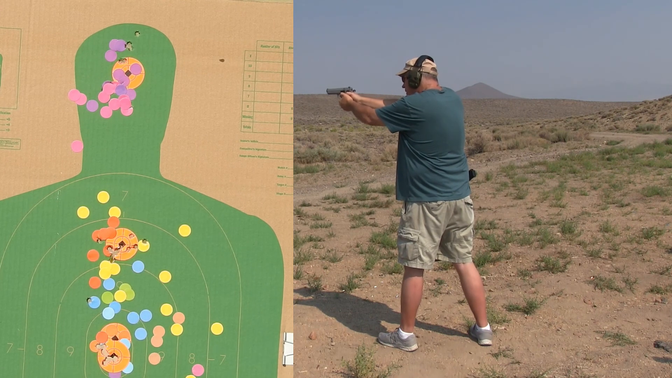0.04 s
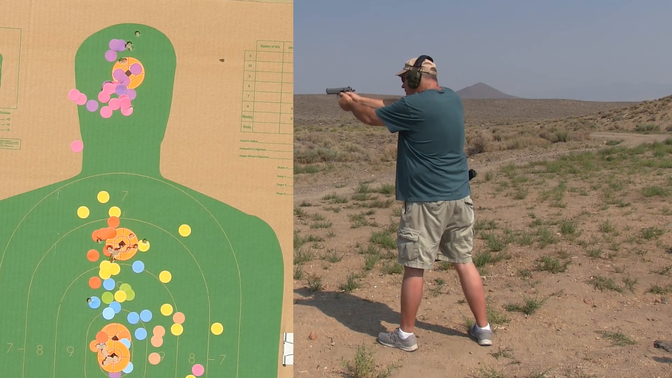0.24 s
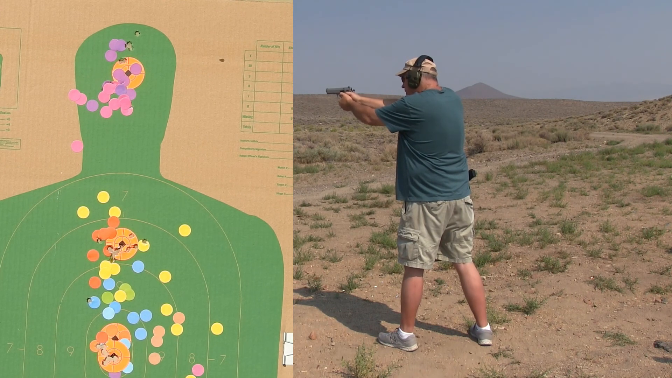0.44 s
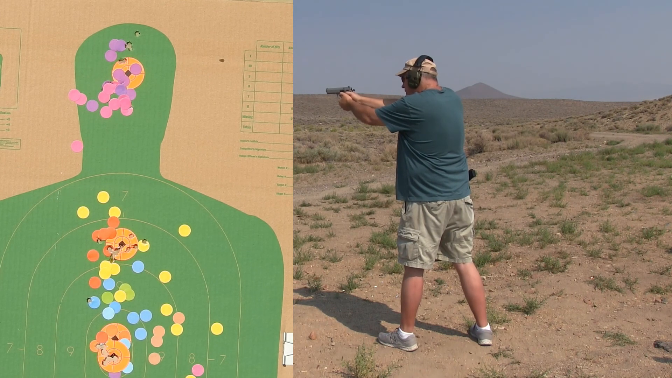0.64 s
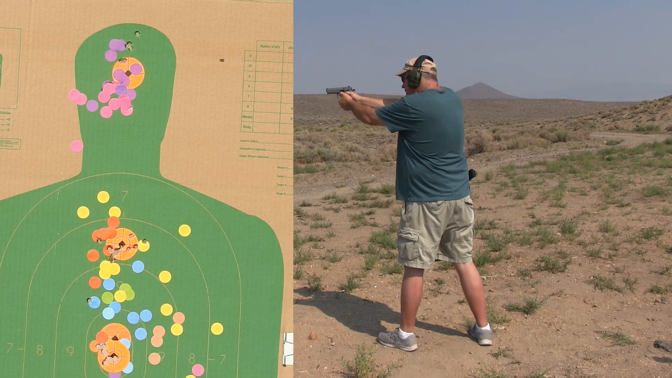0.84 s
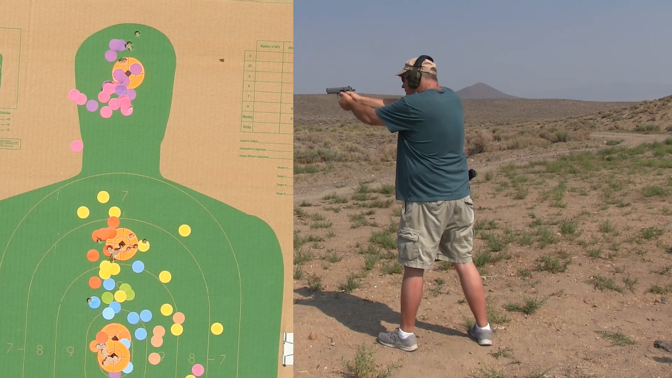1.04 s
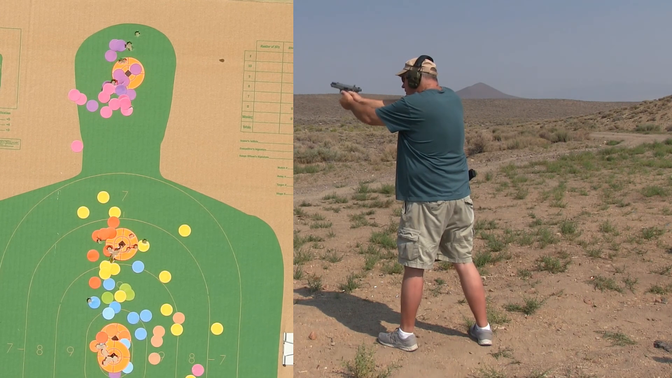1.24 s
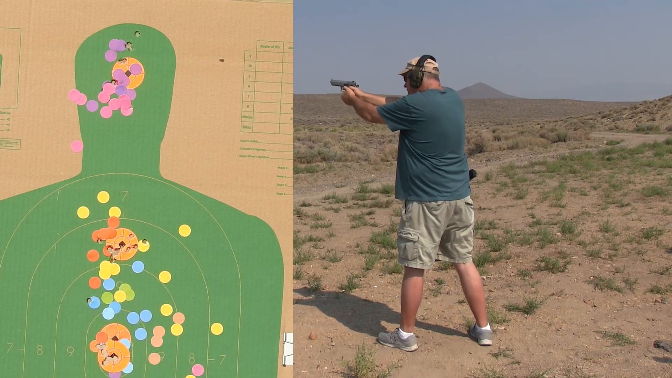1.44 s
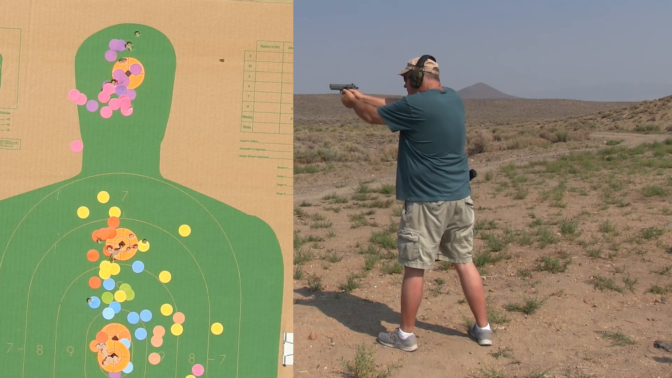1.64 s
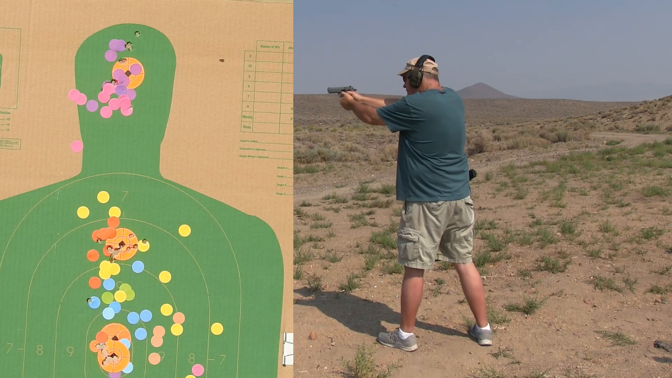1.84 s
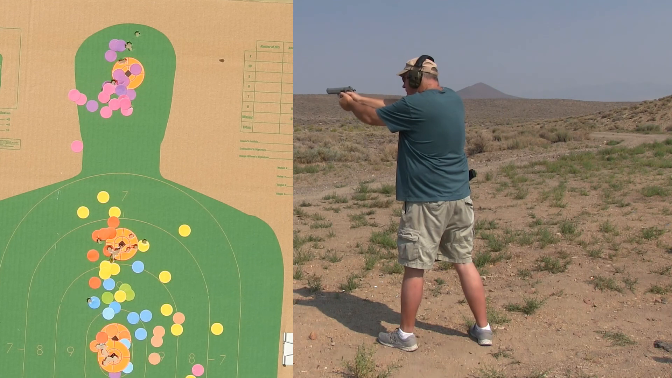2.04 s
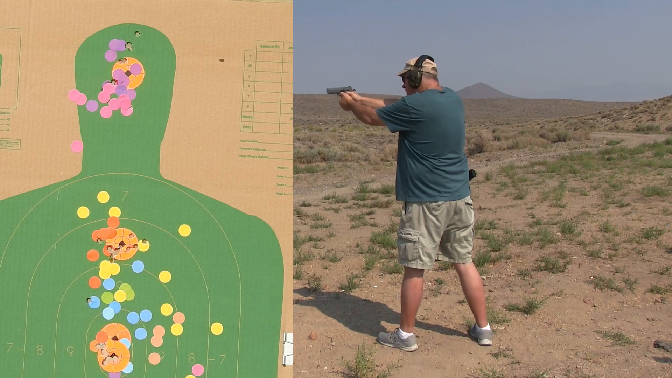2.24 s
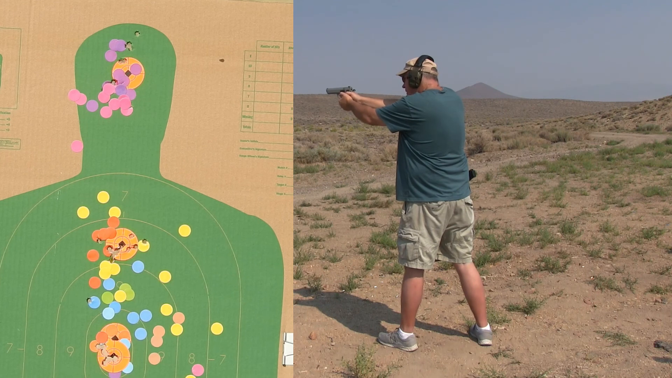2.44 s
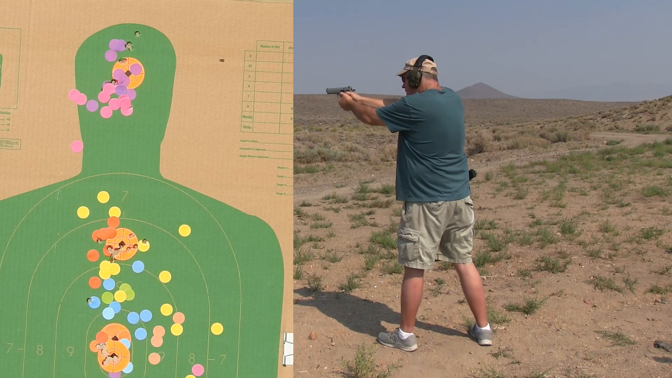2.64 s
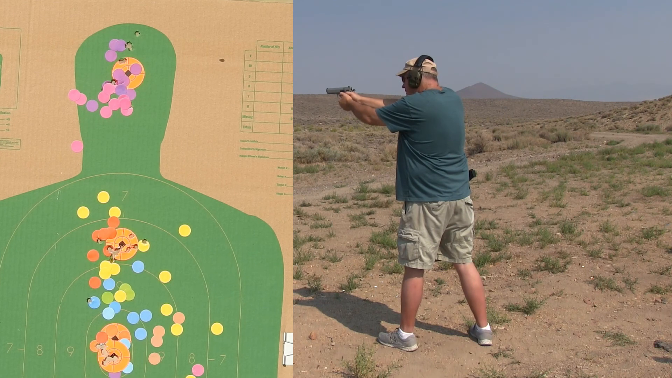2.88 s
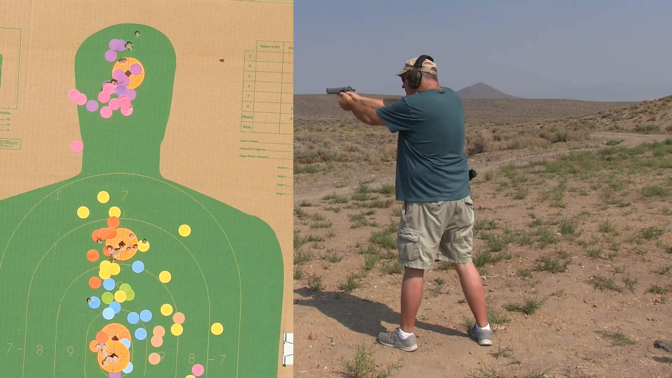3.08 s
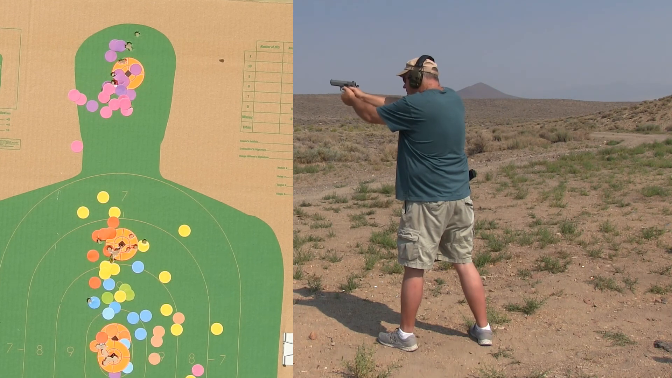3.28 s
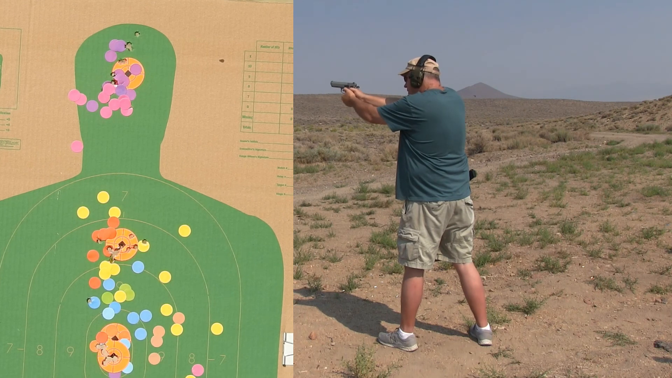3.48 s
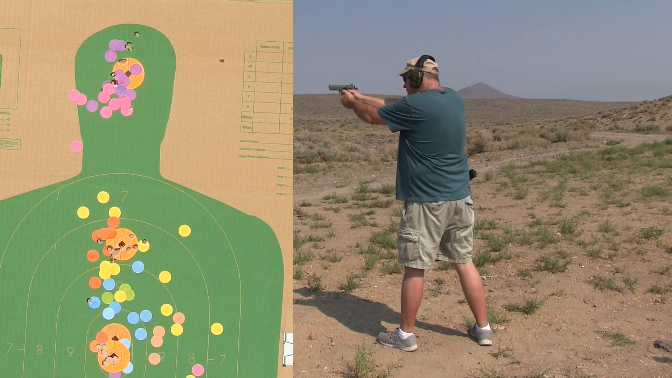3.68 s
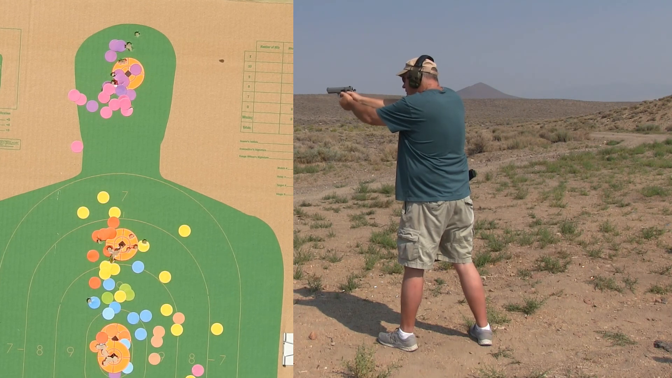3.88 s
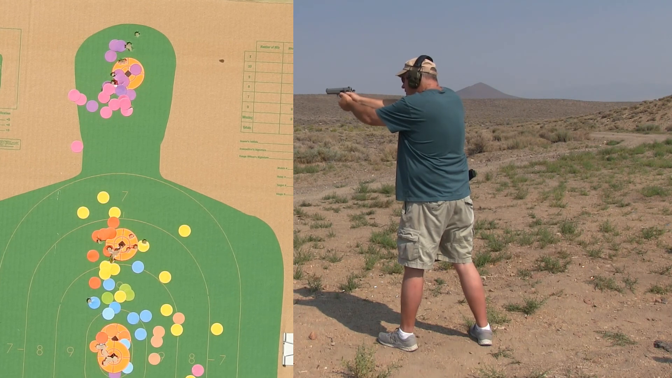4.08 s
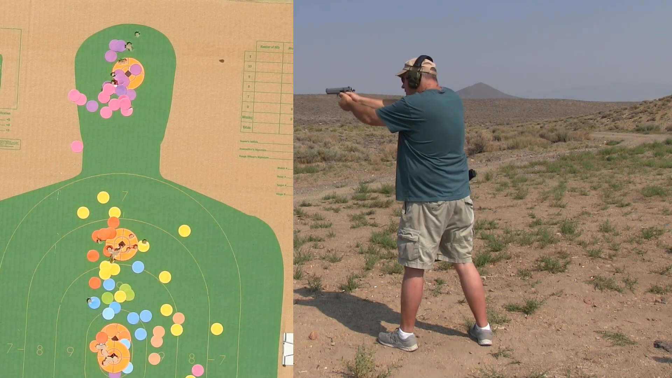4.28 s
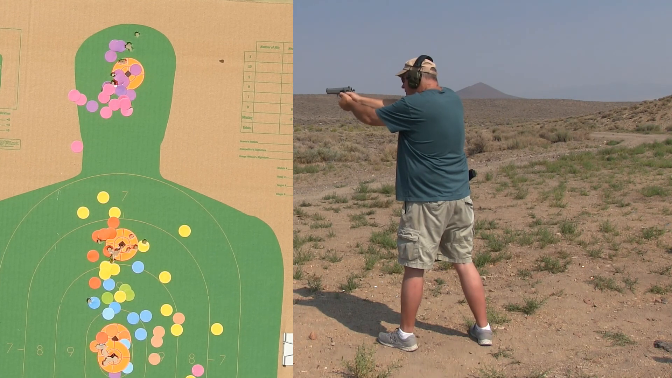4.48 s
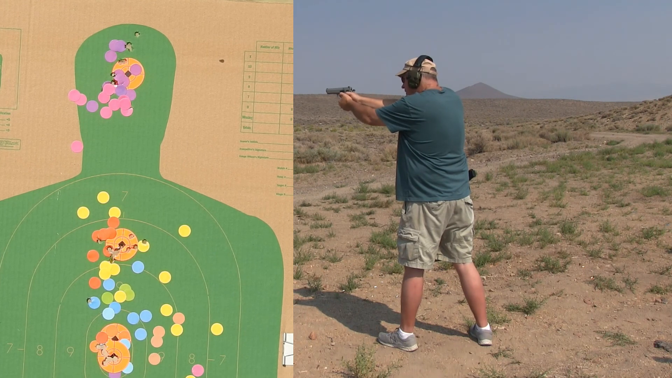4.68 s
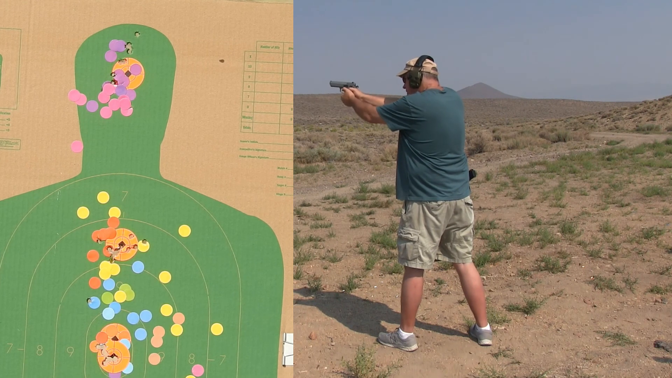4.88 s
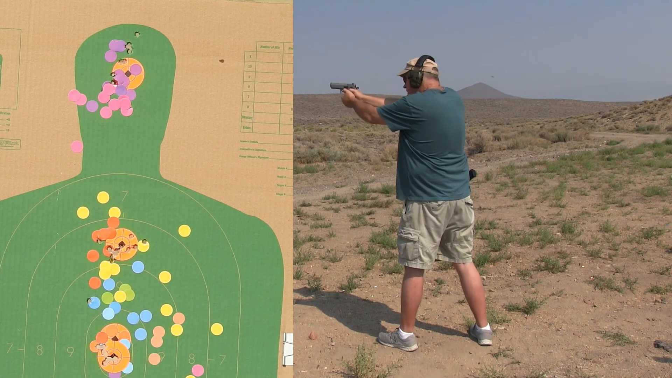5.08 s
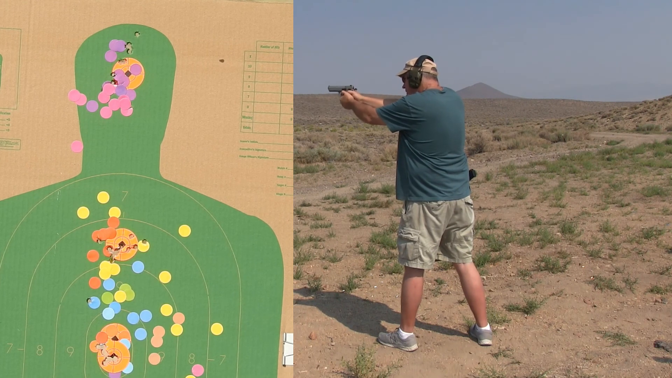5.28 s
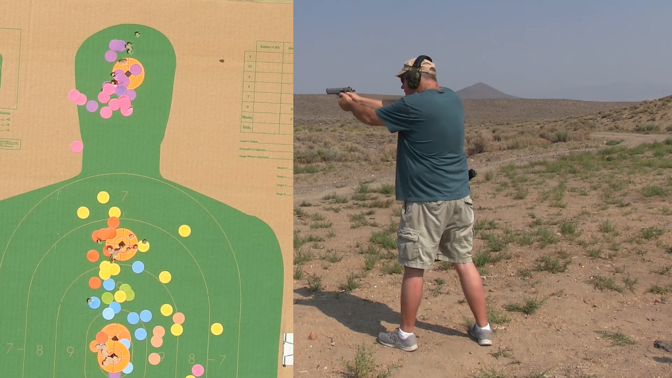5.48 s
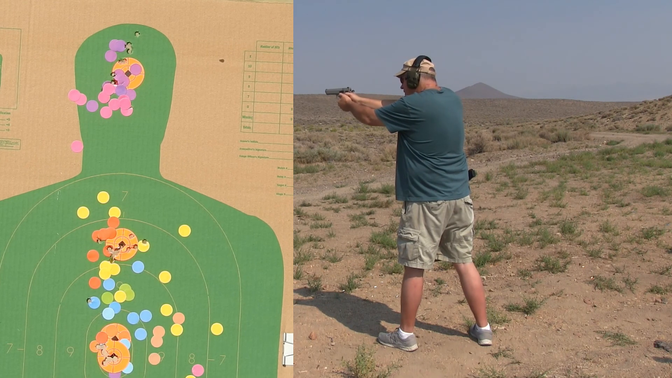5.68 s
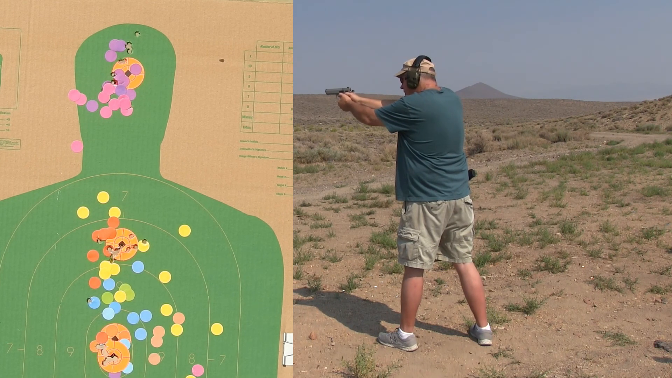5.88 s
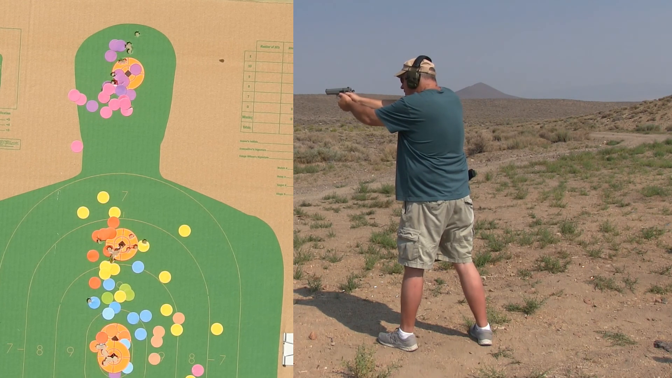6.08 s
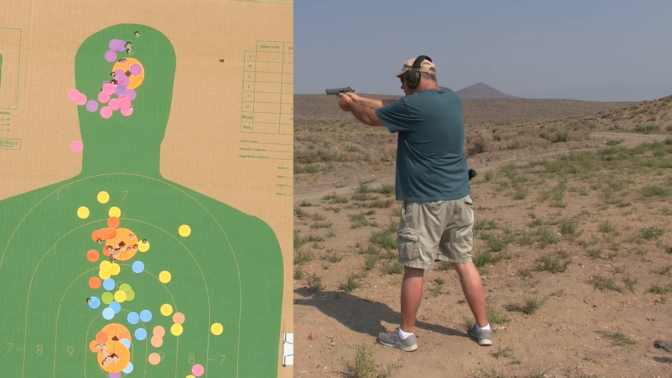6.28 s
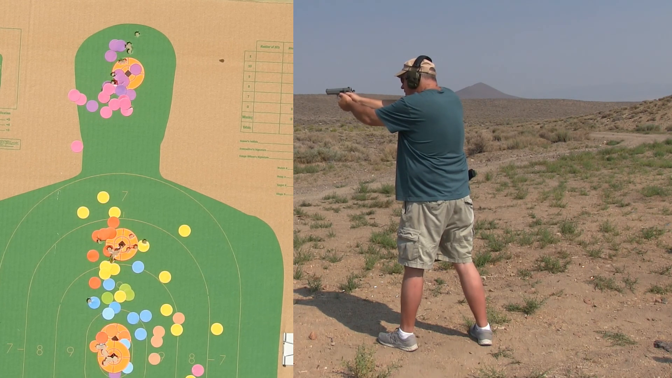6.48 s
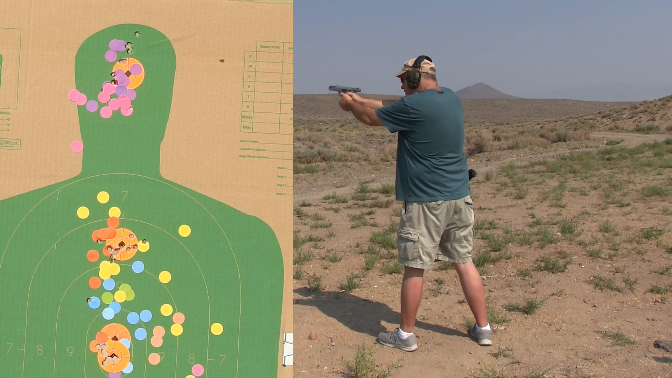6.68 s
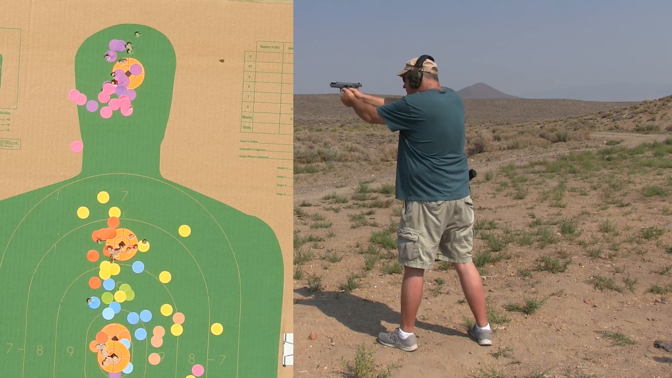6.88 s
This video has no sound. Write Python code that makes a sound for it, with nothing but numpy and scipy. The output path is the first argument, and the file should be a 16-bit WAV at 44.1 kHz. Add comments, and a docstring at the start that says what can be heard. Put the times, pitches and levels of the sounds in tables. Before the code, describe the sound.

A pistol fires four single shots, nearly two seconds apart, a few metres from a stand-mounted microphone on open dry land. Each is a clipped, very sharp crack with a quick slap from a near bank and a fading roll off distant slopes. Between them come action clicks, spent brass ticking down, a heavy thump on the stand, and gusting low wind over faint hiss.

```python
"""Slow pistol shots on an open desert range: steep pressure fronts in a spit of gas noise, a few metres away.
They overload a microphone on a camera stand and duck its gain; a near bank slaps back, far slopes roll.
Action clicks, dull knocks and landing brass are short noise bursts; the brass also rings in paired modes.
A bump jolts the stand, a far report is a dulled pulse with a noise tail, and an echo of an earlier shot dies.
Low noise that rises in gusts is wind on the microphone, over rustling brush and steady hiss."""
import sys
import numpy as np
from scipy import signal
from scipy.fft import rfft, irfft
from scipy.io import wavfile
from scipy.ndimage import uniform_filter1d

SR = 44100
rng = np.random.default_rng(int(sys.argv[2]) if len(sys.argv) > 2 else 0)


def wav_out(sig):
    """Save sig, one row per channel (or a flat mono array), as 16-bit PCM at SR to the path in sys.argv[1]."""
    wavfile.write(sys.argv[1], SR, np.round(np.clip(np.atleast_2d(sig).T, -1, 1) * 32767).astype(np.int16))


N = 305600
TIME = np.arange(N) / SR   # t/s

# Every *_SPECTRUM gives the relative density of a noise: (f/Hz, level/dB per Hz)

# Pistol shots: (t/s, blast level/dB, gas turbulence level/dB, rolling echo level/dB,
#   muzzle blast lag/ms, muzzle blast length/ms, ground bounce lag/ms, ground bounce length/ms)
SHOTS = [(1.288, 0, 1, 0, 0.99, 0.64, 4.42, .31), (3.2209, -2.5, 1, 0.46, .92, 0.55, 4.22, 0.62),
         (4.8116, -1.5, 5, -0.25, 1.044, 0.29, 4.2, 0.65), (6.7368, -2, -3, 0.5, 1.028, 0.26, 4.25, 0.61)]
# Turbulent muzzle gas: (f/Hz, level/dB per Hz)
GAS_SPECTRUM = [(300, -12), (1600, -26.0), (2300, -2.5), (3200, -6.5), (4400, -12.5), (9000, -8.5), (16000, -39)]
# Fronts thrown back by the near bank: (delay/ms, level/dB, length/ms)
BANK_FRONTS = [(31.47, 25, 0.09), (32.5, 18, 0.77), (34.24, 9.5, 0.22)]
# Stretches of land that scatter the shot back, from the shooter's feet to the farthest hillside:
#   (delay/s, level/dB, swell/dB per s, fade/dB per s)
LAND = [(.008, -5, 3005, 5002), (0.04, -2, 1700, 450), (0.0705, -0.5, 3000, 6000), (0.097, -14.5, 244, 56),
        (0.312, -8.5, 134, 165), (0.363, -16.5, 248, 108), (.53, -27.5, 91, 46.5), (.685, -23.5, 216, 297),
        (.78, -29, 119, 108)]
# Scatter before the air dulls it: (f/Hz, level/dB per Hz)
SCATTER_SPECTRUM = [(50, -15.5), (130, -2.5), (330, -0.5), (480, -0.5), (850, 0), (1300, -7), (2200, -12),
                    (3200, -15.5), (5500, -15.5), (8000, -24), (15000, -31.5)]
# Shot before the start, of which only the echo is left: t/s, level/dB
EARLIER_SHOT_S, EARLIER_ECHO_DB = -.6, 0.5
# Clicks of the pistol's action and trigger: (t/s, bright tick level/dB, frame level/dB)
CLICKS = [(1.413, -17, -18), (1.461, -18.5, -13), (1.682, -14.5, -22), (3.274, -19.5, -22),
          (3.334, -16, -14), (3.398, -19, -12), (3.653, -16, -15.5), (4.938, -20, -23), (5.009, -28, -28),
          (5.2532, -16, -16.5), (6.85, -16, -12), (6.922, -19, -12)]
# Bright tick of the steel parts: (f/Hz, level/dB per Hz)
TICK_SPECTRUM = [(500, -30), (4000, -17), (6400, 3.5), (9500, -9), (12000, -2.5), (16000, -11)]
# Answer of the frame: (f/Hz, level/dB per Hz)
FRAME_SPECTRUM = [(500, -23), (2300, 6), (4500, -6), (12000, -35)]
# Spent cases landing: (t/s, tick level/dB, thud level/dB, ring f/Hz, ring level/dB, ring decay/s)
CASES = [(0.1491, -30.5, -15.5, 10000, -65, .01), (0.243, -32.5, -38, 10020, -40, 0.028),
         (2.0499, -16.5, 2, 10760, -38, 0.055), (2.3294, -33, -42, 10830, -47, .025),
         (3.983, -24.5, -11.5, 11250, -60, .03), (4.057, -36.5, -45, 11250, -62, .03),
         (5.6376, -26.5, -18, 11050, -48, .03)]
# Tick of a landing case: (f/Hz, level/dB per Hz)
CASE_SPECTRUM = [(300, -3), (1200, -4), (2500, 1.5), (5000, 5), (8000, -10), (12000, -2), (16000, -46)]
# Dull knocks and scuffs: (t/s, level/dB, decay/s)
KNOCKS = [(.716, -37.5, 0.038), (.984, -37, .006), (1.464, -3.5, 0.0036), (2.014, -18.5, 0.023),
          (2.020, -17, 0.039), (5.009, -7, 0.0068)]
# Knocks, and the thud of a case: (f/Hz, level/dB per Hz)
KNOCK_SPECTRUM = [(40, -5), (170, 6.5), (600, 6), (1200, -7), (2500, -22), (3300, -22.5), (7000, -30.5),
                  (15000, -84)]
# Bumps of the camera stand: (t/s, shudder level/dB, shudder decay/s, first jolt level/dB)
BUMPS = [(2.042, -2.5, 0.081, 6), (6.16, -31, 0.066, -36)]
# Shuddering legs of the stand: (f/Hz, level/dB per Hz)
STAND_SPECTRUM = [(20, 0.5), (48, 9), (65, -0.5), (85, -4), (125, -2), (200, -18.5), (380, -20), (700, -45),
                  (2000, -85)]
# Far-off report and its echoes: (t/s, level/dB)
FAR_ARRIVALS = [(5.9789, -9), (5.994, -35), (6.03, -17)]
# Scatter trailing the far report: (f/Hz, level/dB per Hz)
FAR_SPECTRUM = [(40, 6), (180, 8), (700, -4), (1400, -11.5), (2600, -23.5), (3100, -32), (15000, -48)]
# Gusts on the microphone: (peak t/s, level/dB, half length/s)
GUSTS = [(0.19, -19, 0.15), (1.102, -20.5, 0.55), (2.123, -16.5, 0.15), (4.398, -28.5, 0.45),
         (6.27, -18.5, 0.2)]
# Wind eddies on the microphone: (f/Hz, level/dB per Hz)
RUMBLE_SPECTRUM = [(12, 11), (25, -2), (45, -10), (70, -21.5), (120, -30), (250, -34.5), (1000, -74)]
# Rustling brush: (f/Hz, level/dB per Hz)
BRUSH_SPECTRUM = [(60, 1.5), (150, 2.5), (330, -2), (750, -5.5), (1200, -13), (2000, -22.5), (4000, -36),
                  (15000, -57)]
# Steady hiss: (f/Hz, level/dB per Hz)
HISS_SPECTRUM = [(200, 6.5), (2000, 1.5), (5000, -1.5), (10000, -2.5), (15500, -4.5), (16500, -22)]

CALM_DB = -29   # light steady wind under the gusts


def from_db(db):
    """Amplitude ratio: a level of 20 dB is a factor of ten."""
    return 10 ** (np.asarray(db) / 20)


def noise(spectrum):
    """Random noise of rms 1, filtered to a spectral density interpolated over log frequency."""
    hz, db = np.transpose(spectrum)
    bins = np.maximum(np.fft.rfftfreq(N, 1 / SR), 1)
    gain = from_db(np.interp(np.log(bins), np.log(hz), db))
    gain = gain * (bins > 10)   # nothing at or below 10 Hz
    x = irfft(rfft(rng.standard_normal(N)) * gain, N)
    return x / x.std()


def strike(s, decay, rise):
    """Impulsive excitation: the envelope swells quickly at time s, then damping makes it die exponentially."""
    out = np.zeros(N)
    sounding = slice(*np.searchsorted(TIME, [s, s + 20 * decay]))
    age = TIME[sounding] - s
    out[sounding] = (1 - np.exp(-age / rise)) * np.exp(-age / decay)
    return out


def bursts(events, spectrum, rise):
    """Contact noise: each (t/s, level/dB, decay/s) is a short damped burst of one coloured noise."""
    envelope = sum(from_db(db) * strike(s, decay, rise) for s, db, decay in events)
    return noise(spectrum) * envelope


def blast(front_db, crack_ms, tail_ms, tail_length_ms, gas_db, gas_decay, suction_db, suction_decay, sway_db):
    """Shock waves: bullet crack, muzzle blast and ground bounce in turbulent gas, with underpressure between."""
    out = np.zeros(N)
    gas = noise(GAS_SPECTRUM)
    for s, db, turbulence_db, _, blast_lag, blast_ms, ground_lag, ground_ms in SHOTS:
        # bullet nose, bullet tail, muzzle blast, ground bounce
        fronts = [(0, crack_ms), (tail_ms, tail_length_ms), (blast_lag, blast_ms), (ground_lag, ground_ms)]
        shot = sum(shock(s, lag_ms, front_db, length_ms) for lag_ms, length_ms in fronts)
        shot += from_db(gas_db + turbulence_db) * gas * strike(s - .0002, gas_decay, rise=0.00044)
        shot -= from_db(suction_db) * strike(s, suction_decay, rise=0.00012)
        out += from_db(db) * shot
        out += bank_slap(s)
        out += from_db(sway_db) * sway(s, first_swing=0.02614, slowing=0.7, decay=0.14)
    return out


def shock(s, delay_ms, db, length_ms):
    """Shock front: pressure jumps at once, then falls back along a parabola over its length."""
    start, length = s + delay_ms / 1000, length_ms / 1000
    out = np.zeros(N)
    passing = slice(*np.searchsorted(TIME, [start, start + length]))
    out[passing] = from_db(db) * (1 - ((TIME[passing] - start) / length) ** 2)
    return out


def bank_slap(s):
    """Reflection: the near bank returns delayed fronts, rounded by its loose earth."""
    return uniform_filter1d(sum(shock(s, *front) for front in BANK_FRONTS), size=3)


def sway(s, first_swing, slowing, decay):
    """Damped oscillation: the overloaded microphone swings back to rest, each swing slower than the last."""
    age = np.maximum(TIME - s, 0)
    return -strike(s, decay, rise=0.000067) * np.cos(np.pi / 2 * (age / first_swing) ** slowing)


def rolling_echo(air_loss_db, loss_slope, uneven_db):
    """Scattering and absorption: longer paths lose more treble to the air (air_loss_db per s at 5 kHz)."""
    hz, age, scatter = signal.stft(noise(SCATTER_SPECTRUM), SR, nperseg=128)
    loss_db = air_loss_db * (hz[:, None] / 5000) ** loss_slope * age
    drift = uniform_filter1d(rng.standard_normal(len(age)), size=8)   # random slow unevenness of the level
    drift_db = uneven_db * drift / drift.std()
    gain = np.sqrt(returns(age)) * from_db(drift_db - loss_db)
    response = signal.istft(scatter * gain, SR, nperseg=128)[1][:N]
    fired = [(EARLIER_SHOT_S, EARLIER_ECHO_DB)] + [(s, echo_db) for s, _, _, echo_db, *paths in SHOTS]
    samples = np.arange(N)
    out = np.zeros(N)
    for s, echo_db in fired:   # the land answers every shot alike
        delayed = np.interp(samples - round(s * SR), samples, response, left=0, right=0)
        out += from_db(echo_db) * delayed
    return out


def returns(age):
    """Incoherent addition: powers from the stretches of land add, each swelling to its delay, then fading."""
    power = 0
    for delay, db, swell, fade in LAND:
        below_peak_db = np.maximum(swell * (delay - age), fade * (age - delay))
        power = power + from_db(db - below_peak_db) ** 2
    return power


def action(decay, rise):
    """Impact: steel parts snap with a bright tick, and the frame answers lower down."""
    ticks = bursts([(s, db, decay) for s, db, _ in CLICKS], TICK_SPECTRUM, rise)
    frame = bursts([(s, db, decay) for s, _, db in CLICKS], FRAME_SPECTRUM, rise)
    return ticks + frame


def brass(tick_decay, thud_decay, split_hz):
    """Modal beating: a case ticks and thuds as it lands, and its mouth rings in two close modes."""
    out = bursts([(s, db, tick_decay) for s, db, *rest in CASES], CASE_SPECTRUM, rise=0.00015)
    out += bursts([(s, db, thud_decay) for s, _, db, *ring in CASES], KNOCK_SPECTRUM, rise=0.00057)
    for s, _, _, hz, ring_db, decay in CASES:
        upper = np.sin(2 * np.pi * hz * (TIME - s))
        lower = .5 * np.sin(2 * np.pi * (hz - split_hz) * (TIME - s))
        out += from_db(ring_db) * strike(s, decay, rise=0.001) * (upper + lower)
    return out


def knocks(rise):
    """Damped impact: dull knocks and scuffs are brief bursts of mostly low noise."""
    return bursts(KNOCKS, KNOCK_SPECTRUM, rise)


def stand(jolt_hz, jolt_decay, opposite_db):
    """Structural vibration: a heavy swing and a shudder, with a very faint second shudder opposite by channel."""
    jolts = np.zeros(N)
    for s, _, _, db in BUMPS:
        swing = np.sin(2 * np.pi * jolt_hz * (TIME - s))
        jolts += from_db(db) * strike(s, jolt_decay, rise=0.0014) * swing
    shakes = [row[:3] for row in BUMPS]
    shudder = bursts(shakes, STAND_SPECTRUM, rise=0.0021)
    second = bursts(shakes, STAND_SPECTRUM, rise=0.0021)
    return jolts + shudder + from_db(opposite_db) * np.array([second, -second])


def far_report(pop_ms, dull_hz, tail_db, tail_decay):
    """Low-pass propagation: each arrival is a pressure pulse dulled by distance that trails weaker scatter."""
    pops = -sum(shock(s, 0, db, pop_ms) for s, db in FAR_ARRIVALS)
    dulled = signal.sosfilt(signal.butter(12, dull_hz, fs=SR, output="sos"), pops)
    tails = bursts([(s, db + tail_db, tail_decay) for s, db in FAR_ARRIVALS], FAR_SPECTRUM, rise=0.00044)
    return dulled + tails


def wind_level():
    """Addition of powers: bell-shaped gusts rise over the calm, given as a level in dB."""
    gusts = sum(from_db(db) ** 2 * np.exp(-((TIME - s) / length) ** 2) for s, db, length in GUSTS)
    return 10 * np.log10(from_db(CALM_DB) ** 2 + gusts)


def wind_rumble(wind_db, own_db):
    """Turbulent pressure: low eddies common to both channels, plus a faint independent trace in each."""
    own = np.array([noise(RUMBLE_SPECTRUM), noise(RUMBLE_SPECTRUM)])
    eddies = noise(RUMBLE_SPECTRUM) + from_db(own_db) * own
    return from_db(wind_db) * eddies


def breeze(wind_db, calm_rustle_db, follows):
    """Flow noise: brush rustle rises by a small share (follows, dB per dB) of each gust's rise."""
    rustle_db = calm_rustle_db + follows * (wind_db - CALM_DB)
    return from_db(rustle_db) * noise(BRUSH_SPECTRUM)


def hiss(shared_db, width_db):
    """Stationary noise: a steady common hiss, and a faint independent white hiss in each channel for width."""
    return from_db(shared_db) * noise(HISS_SPECTRUM) + from_db(width_db) * rng.standard_normal((2, N))


def scene():
    """Superposition: the pressures of all sources add in two nearly equal channels (decays and rises in s)."""
    shots = blast(front_db=35.5, crack_ms=0.48, tail_ms=.66, tail_length_ms=0.045, gas_db=30.5,
                  gas_decay=0.0014, suction_db=26, suction_decay=0.0025, sway_db=17.0)
    echo = rolling_echo(air_loss_db=23.5, loss_slope=1.43, uneven_db=1.5)
    clicks = action(decay=0.0027, rise=0.00048)
    cases = brass(tick_decay=0.0019, thud_decay=0.0029, split_hz=17)
    thumps = knocks(rise=0.00052) + stand(jolt_hz=49.3, jolt_decay=0.0071, opposite_db=-41)
    far_off = far_report(pop_ms=0.78, dull_hz=2560, tail_db=-11.5, tail_decay=.026)
    wind_db = wind_level()
    wind = wind_rumble(wind_db, own_db=-37.5) + breeze(wind_db, calm_rustle_db=-44, follows=0.049)
    return shots + echo + clicks + cases + thumps + far_off + wind + hiss(shared_db=-51.5, width_db=-67)


def gain_control(x, threshold_db, depth_db, release_db_per_s):
    """Peak limiting: loud peaks pull the gain down at once, to a set depth; it climbs back steadily in dB."""
    over = 20 * np.log10(np.abs(x).max(axis=0) + 1e-9) - threshold_db
    climb = release_db_per_s * TIME
    held = np.maximum.accumulate(over + climb) - climb
    return x * from_db(-uniform_filter1d(np.clip(held, 0, depth_db), size=8))


def record(dry):
    """Nonlinear and band-limited pickup: gain control, hard overload, softened treble, then a steep cutoff."""
    ducked = gain_control(dry, threshold_db=-4, depth_db=19, release_db_per_s=89)
    clipped = np.clip(ducked, -.98, .98)
    soften = np.array([.095, .84, .065])   # mirrored for the second channel: one lands a hair later
    left = np.convolve(clipped[0], soften, "same")
    right = np.convolve(clipped[1], soften[::-1], "same")
    low_pass = signal.butter(16, 16300, fs=SR, output="sos")   # cutoff f/Hz
    return signal.sosfiltfilt(low_pass, np.array([left, right]))


dry = scene()
out = record(dry)
wav_out(out)
```